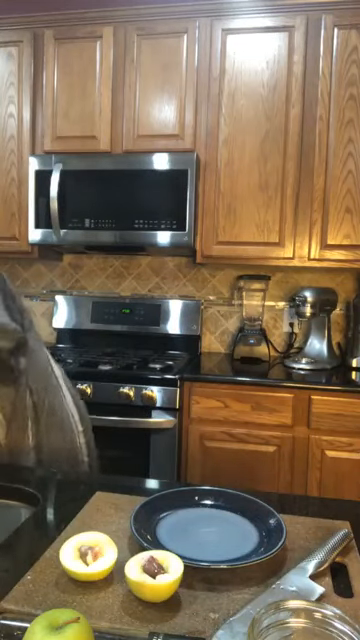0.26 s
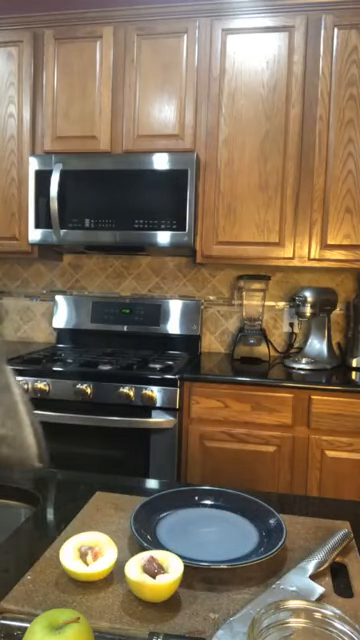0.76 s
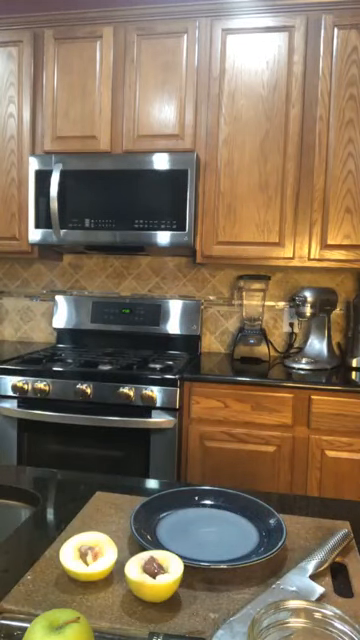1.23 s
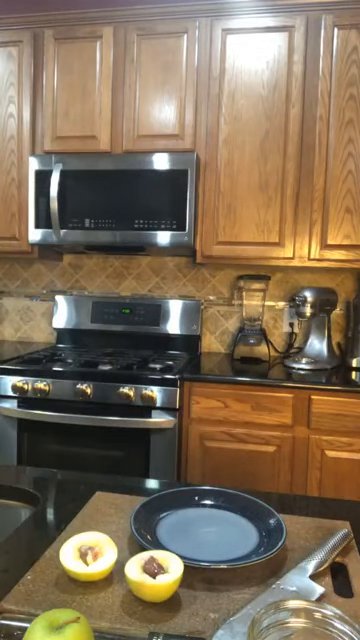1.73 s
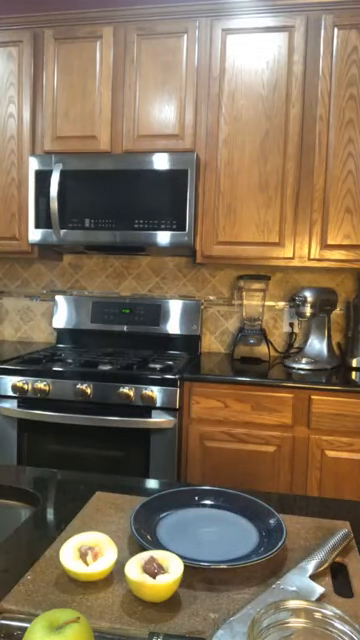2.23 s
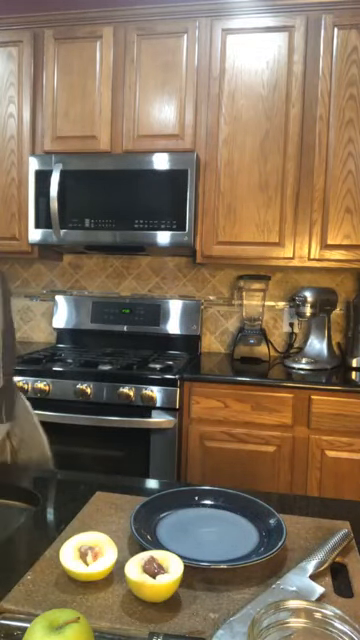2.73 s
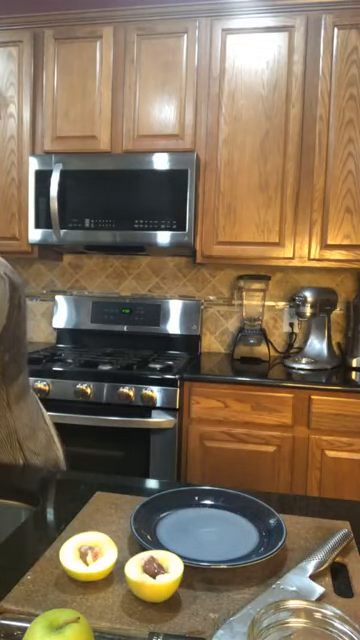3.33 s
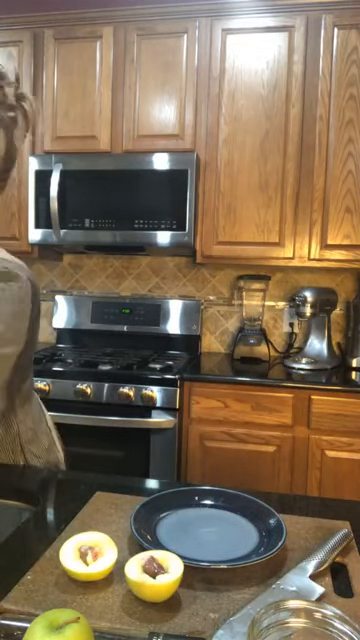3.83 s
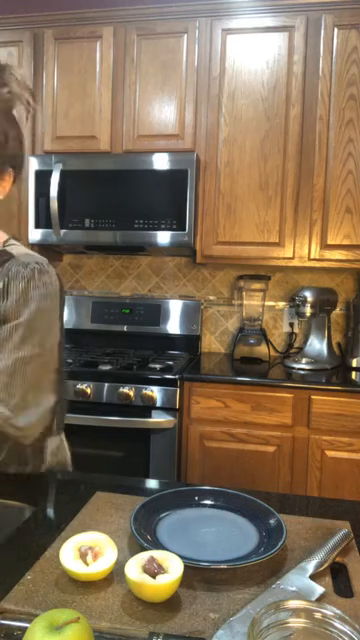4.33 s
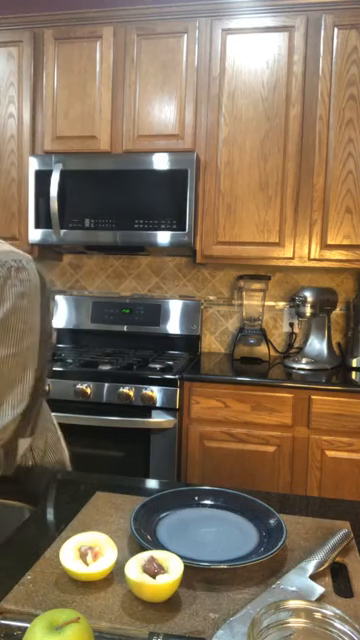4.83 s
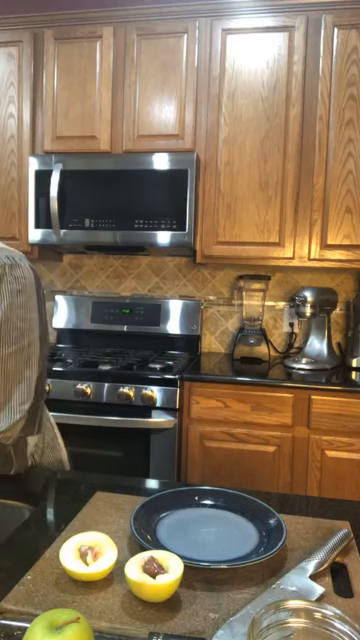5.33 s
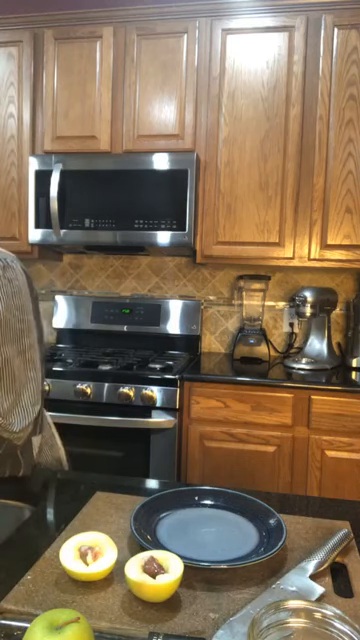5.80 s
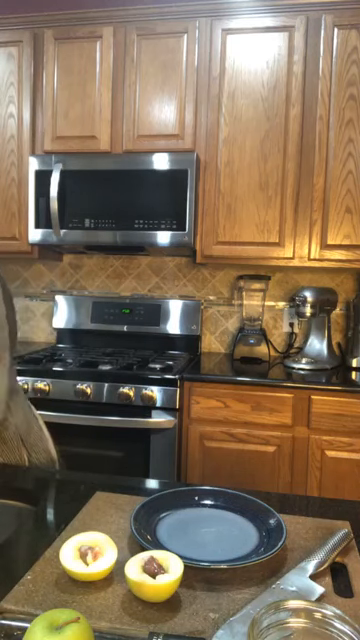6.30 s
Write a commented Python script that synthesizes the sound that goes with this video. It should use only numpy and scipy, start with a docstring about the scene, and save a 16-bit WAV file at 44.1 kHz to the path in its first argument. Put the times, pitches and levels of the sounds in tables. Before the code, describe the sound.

A counter microphone hears faint room air and hum. A coat rustles, a distant wooden door claps twice with a ringing tail, and something hollow knocks. Dull treads, dry floor ticks and gritty scuffs follow, plus light dish touches. After midway, bright aerated water bursts on and stays steady, drumming on the steel sink, with bubbles and irregular splashes, strongest near the end.

```python
"""A kitchen, heard by one microphone on the counter over room air and a low appliance hum.
A cupboard door bangs and rebounds across the room (dense reflections and panel modes), something hollow
is bumped (ringing modes), a coat swishes, and the floor ticks and scuffs as someone walks to the sink.
The tap opens: an aerated jet hisses (dense grains) and drums on the steel basin (ringing modes), and
water spatters and gurgles (grains, bubbles) off what is held under it, with drops, splashes and clinks."""
import sys
import numpy as np
from scipy import signal
from scipy.fft import rfft, irfft, next_fast_len
from scipy.io import wavfile
from scipy.ndimage import uniform_filter1d

SR = 44100
rng = np.random.default_rng(int(sys.argv[2]) if len(sys.argv) > 2 else 0)


def to_wav(sig):
    """Store sig (one row per channel, or 1-D mono) as 16-bit WAV at the path in sys.argv[1].

    Samples outside -1..1 are clipped; the rate is SR.
    """
    pcm = np.clip(np.atleast_2d(sig), -1, 1) * 32767
    pcm = np.round(pcm).astype(np.int16)
    wavfile.write(sys.argv[1], SR, pcm.T)  # frames by channels


N = 289207
TIME = np.arange(N) / SR


def from_db(db):
    """Decibels to gain."""
    return 10 ** (np.asarray(db) / 20)


def rms_one(x):
    """Scale to rms 1."""
    return x / np.sqrt(np.mean(x ** 2) + 1e-20)


def dying(t, t60):
    """Amplitude that falls 60 dB in t60."""
    return np.exp(-np.log(1000) * t / t60)


def at_hz(points, hz):
    """Read (frequency [Hz], value) points on a log-frequency axis."""
    f, value = np.transpose(points)
    return np.interp(np.log(np.maximum(hz, 1)), np.log(f), value)


def coloured(x, spectrum):
    """Give a steady sound a spectrum that falls away steeply past its ends; rms 1."""
    size = next_fast_len(len(x))
    hz = np.arange(size // 2 + 1) * SR / size + 1e-3
    low_end, high_end = spectrum[0][0], spectrum[-1][0]
    ends = np.minimum(1, np.minimum(hz / low_end, high_end / hz)) ** 4   # 24 dB per octave
    shaped = rfft(x, size) * from_db(at_hz(spectrum, hz)) * ends
    return rms_one(irfft(shaped, size)[:len(x)])


def band(x, hz, octaves, order=2):
    """Band-pass around a centre."""
    edges = np.clip([hz / 2 ** (octaves / 2), hz * 2 ** (octaves / 2)], 10, SR / 2 - 1000)
    return signal.sosfilt(signal.butter(order, edges, "band", fs=SR, output="sos"), x)


def drift(rate):
    """Slow chance: straight lines between random values of spread 1, `rate` of them a second."""
    knots = rng.standard_normal(2000)
    return np.interp(TIME * rate, np.arange(len(knots)), knots)


def ring(x, hz, t60):
    """A resonator: a unit click sets a sine of height 1 ringing and dying away."""
    r, w = dying(1 / SR, t60), 2 * np.pi * hz / SR
    return signal.lfilter([0, np.sin(w)], [1, -2 * r * np.cos(w), r * r], x + 1e-18)


def ring_modes(x, modes):
    """Sum the modes (frequency [Hz], level [dB], t60 [s]) of one body, with alternating signs."""
    return sum((-1) ** k * from_db(db) * ring(x, hz, t60) for k, (hz, db, t60) in enumerate(modes))


def add(out, s, sound):
    """Mix a sound in at a time."""
    i = int(s * SR)
    out[i:i + len(sound)] += sound[:N - i]


def grains(per_s, spread_db):
    """Random impacts of uneven size."""
    sizes = from_db(spread_db * np.minimum(rng.exponential(1, N), 5))
    return sizes * rng.choice([-1, 1], N) * (rng.random(N) < per_s / SR)


def strokes(rows, attack_s, hold_s, t60):
    """One envelope from rows (time [s], level [dB]): each stroke rises, holds and dies away."""
    envelope = 0
    for s, db in rows:
        rise = np.clip((TIME - s) / attack_s, 0, 1)
        envelope = envelope + from_db(db) * rise * dying(np.maximum(TIME - s - attack_s - hold_s, 0), t60)
    return envelope


def swing(rows):
    """Gain curve from rows (time [s], level [dB]), relative to their mean level."""
    s, db = np.transpose(rows)
    return from_db(np.interp(TIME, s, db - db.mean()))


def snaps(rows, crest_db):
    """Short impacts: noise bursts that die away, each in one region of pitch."""
    out, t = np.zeros(N), TIME[:SR // 3]
    for s, db, hz, octaves, t60 in rows:
        fall = dying(t, t60)
        burst = band(rng.standard_normal(len(t)) * fall, hz, octaves)
        even = burst * np.linalg.norm(fall) / np.linalg.norm(burst)
        add(out, s, from_db(db - crest_db) * even)   # peaks stand about crest_db above the noise level
    return out


# reverberation time of the room: (frequency [Hz], t60 [s])
ROOM_DECAY = [(80, 1), (300, 0.86), (1000, 0.96), (3000, 0.55), (6000, 0.88), (14000, 0.21)]


def diffuse(noise, tilt_db=0):
    """Let noise die away octave by octave as sound does in the room; tilt_db is per octave."""
    t = TIME[:len(noise)]
    spectrum, hz = rfft(noise), np.arange(len(noise) // 2 + 1) * SR / len(noise)
    octave = np.clip(np.log2((hz + 1) / 1000), -4, 4)   # from 1 kHz
    out = 0
    for k in range(-4, 5):
        part = irfft(spectrum * np.maximum(0, 1 - abs(octave - k)), len(noise))
        out = out + part * from_db(tilt_db * k) * dying(t, at_hz(ROOM_DECAY, 1000 * 2. ** k))
    return out


def kitchen(x, wet_db):
    """Direct sound plus reflections off cabinets and tiles, strongest early on."""
    t = TIME[:SR]
    echo = diffuse(rng.standard_normal(SR)) * (t > .004) * (1 + 1.4 * dying(t, 0.22))
    return x + from_db(wet_db) * signal.fftconvolve(x, echo / np.linalg.norm(echo))[:N]


# colour of the room air: (frequency [Hz], density [dB per Hz])
AIR_COLOUR = [(25, -31), (55, -11), (100, -11), (130, -3), (174, -11), (248, -8), (461, -14.5), (812, -22),
              (1180, -24.5), (2200, -31), (4800, -35.5), (8000, -40), (15800, -48.5)]
AIR_DB = -63   # rms
# appliance hum partials: (frequency [Hz], rms level before wavering [dB])
HUM_PARTIALS = [(119.5, -69), (237, -77.5), (301, -80.5), (458, -79)]


def background(waver_db=2):
    """Steady noise of room air, and hum partials that waver in level and phase."""
    hum = 0
    for hz, db in HUM_PARTIALS:
        level = np.sqrt(2) * from_db(db + waver_db * drift(4.46))
        hum = hum + level * np.sin(2 * np.pi * hz * TIME + .5 * drift(6))
    return hum + from_db(AIR_DB) * coloured(rng.standard_normal(N), AIR_COLOUR)


# swishes of a coat: (time of middle [s], rms level at middle [dB], half-length [s])
COAT_SWISHES = [(0.144, -74.5, 0.028), (0.546, -74.5, 0.046), (0.613, -69.5, 0.011), (0.657, -72, 0.051),
                (2.256, -83, 0.095), (2.564, -71.5, 0.28), (3.074, -74.5, 0.05)]
# colour of rubbing cloth: (frequency [Hz], density [dB per Hz])
CLOTH_COLOUR = [(1500, -1), (3000, 2), (6500, 3), (9000, -1.5), (15000, -5)]


def coat():
    """Cloth slides over cloth in short soft swishes."""
    swishes = sum(from_db(db) * np.exp(-((TIME - s) / length) ** 2) for s, db, length in COAT_SWISHES)
    return swishes * coloured(grains(4000, 1.5), CLOTH_COLOUR)


# soles scuffing: (time [s], rms level [dB])
SOLE_SCUFFS = [(1.55, -63), (1.62, -74), (1.735, -69.5), (1.955, -59.5), (2.075, -63), (2.14, -74),
               (2.44, -67.5), (2.51, -74), (2.675, -61.5), (2.77, -65)]
# colour of the scuffs: (frequency [Hz], density [dB per Hz])
SCUFF_COLOUR = [(700, 4.5), (1400, 1.5), (2600, 3), (4500, -4), (7000, -7.5), (9000, -21), (15000, -35)]
# weight coming down on the floor: (time [s], rms level [dB])
FLOOR_TREADS = [(1.35, -59.5), (1.56, -55), (1.76, -56), (2.06, -54.5)]


def walking():
    """Grainy friction of soles over the dull sound of the floor taking weight."""
    scuffs = strokes(SOLE_SCUFFS, attack_s=0.017, hold_s=0.0083, t60=0.42)
    brush = scuffs * coloured(grains(3000, 2.1), SCUFF_COLOUR)
    treads = strokes(FLOOR_TREADS, attack_s=0.015, hold_s=0.074, t60=0.57)
    return brush + treads * rms_one(band(grains(1500, 1.6), hz=320, octaves=2.06))


# floorboard ticks: (time [s], peak level [dB], pitch settled on [Hz], t60 [s])
BOARD_TICKS = [(1.3861, -38.5, 460, 0.051), (1.525, -43.5, 520, 0.013), (1.615, -40.5, 420, 0.026),
               (1.650, -50, 480, 0.011), (1.7387, -44, 484, 0.02), (1.809, -36.5, 544, 0.023),
               (1.927, -43, 440, 0.018), (2.12, -51, 450, 0.026), (2.166, -55, 378, 0.018)]


def boards(sweep=2.47, sweep_s=0.00078, rise_s=0.001):
    """Bending waves carry the highs first, so each tick falls in pitch."""
    out, t = np.zeros(N), TIME[:SR // 8]
    for s, db, hz, t60 in BOARD_TICKS:
        phase = 2 * np.pi * hz * (t + sweep * sweep_s * (1 - np.exp(-t / sweep_s)))
        tick = np.sin(phase) * (1 - np.exp(-t / rise_s)) ** 2 * dying(t, t60)
        add(out, s, from_db(db) * tick / abs(tick).max())
    return out


# sharp contacts of the door and of things being handled:
# (time [s], approximate peak level [dB], centre [Hz], width [octaves], t60 [s])
HARD_CLICKS = [(0.7895, -29, 3500, 1.6, 0.015), (0.799, -22, 4030, 1, 0.019),
               (0.938, -30.5, 2000, 1.6, 0.024), (0.948, -29.5, 4300, 0.48, 0.027),
               (1.136, -42.5, 5000, 1.3, 0.032), (1.140, -44.5, 3100, 1.44, 0.27),
               (1.350, -45, 1650, 1.54, 0.063), (1.575, -54.5, 6000, 0.81, 0.037),
               (1.980, -56, 5900, 1.1, 0.018), (2.057, -42, 1920, 2.1, 0.083),
               (2.058, -43, 6200, .53, 0.018), (2.317, -41, 2630, .9, 0.015),
               (2.328, -54.5, 9000, 2.7, .12), (2.480, -48, 4800, .28, 0.15),
               (2.483, -42.5, 3200, 2.1, 0.028), (2.546, -47.5, 4000, 0.58, .019),
               (2.756, -46, 6400, 1.2, .063), (2.781, -38.5, 2350, 0.4, 0.018),
               (3.403, -55, 2780, 1.9, 0.015), (3.704, -42, 2900, 2, 0.065)]
CRACK_DB = -6.5   # relative to the peak of its floorboard tick
CRACK_HZ, CRACK_OCTAVES, CRACK_T60_S = 1720, 1.06, 0.029


def contacts():
    """Hard clicks, and the dry crack that starts each floorboard tick, as short noise bursts."""
    cracks = [(s, db + CRACK_DB, CRACK_HZ, CRACK_OCTAVES, CRACK_T60_S) for s, db, hz, t60 in BOARD_TICKS]
    return snaps(HARD_CLICKS + cracks, crest_db=9)


# bumps on a hollow body: (time [s], level [dB], contact softness as low-pass [Hz])
BODY_BUMPS = [(1.1403, -28, 5000), (1.2046, -35.5, 450), (1.352, -45, 4160), (2.058, -45, 3000),
              (2.148, -43.5, 900)]
# modes of the hollow body: (frequency [Hz], level [dB], t60 [s])
BODY_MODES = [(202, -9, 0.13), (339, 2, 0.14), (378, -8.5, 0.13), (480, 0, 0.043), (559, -7.5, 0.097),
              (1270, -24.5, 0.21), (2500, -30.5, 0.37), (3130, -31, 0.41), (3950, -41, 0.8),
              (4340, -39, 0.35)]


def bumps():
    """Soft contacts set the hollow body ringing."""
    blows = np.zeros(N)
    for s, db, soft_hz in BODY_BUMPS:
        push = np.exp(-2 * np.pi * soft_hz * TIME[:SR // 100])
        add(blows, s, from_db(db) * push / push.sum())
    return ring_modes(blows, BODY_MODES)


# cupboard door meeting its frame: (time [s], level [dB], tilt [dB per octave])
DOOR_BANGS = [(0.785, -28.5, 2.6), (0.798, -31, 0), (0.936, -33.5, 2), (0.948, -35.5, -0.5)]
# colour of the bangs: (frequency [Hz], density [dB per Hz])
BANG_COLOUR = [(30, -32), (55, -12), (76, 2), (102, 2), (138, 5), (200, 2), (380, -3.5), (550, -1.5),
               (680, -6.5), (1000, -8), (1450, -12), (2100, -12.5), (4000, -21), (7600, -37.5),
               (15800, -59)]
# modes of the door panel: (frequency [Hz], level [dB], t60 [s])
PANEL_MODES = [(131.9, -11, 0.97), (194, -20, 0.58), (265, -16.5, 0.85), (449, -16, 0.26),
               (552, -4.5, 0.22), (840, -25, 0.5), (1000, -18, 0.48), (1120, -6, 0.54), (1158, -26, 0.49),
               (1353, -12.5, 0.25), (1750, -22, 0.89), (2080, -25, .5), (2306, -23, 0.35),
               (3300, -25, 0.89), (3960, -12, 0.22)]


def door(early=1.0, early_t60=0.086, rise_s=.005, tail_db=-4, panel_db=-2):
    """Far away, each bang arrives as a clattering swell of reflections, with the panel ringing in it."""
    out, blows, t = np.zeros(N), np.zeros(N), TIME[:SR * 3 // 2]
    for s, db, tilt_db in DOOR_BANGS:
        swell = (1 - np.exp(-t / rise_s)) * (from_db(tail_db) + early * dying(t, early_t60))
        crowding = grains(3000 + 30000 * TIME, 1.9)[:len(t)]   # reflections get denser as time passes
        reflections = coloured(crowding, BANG_COLOUR)
        even = reflections / np.sqrt(uniform_filter1d(reflections ** 2, size=6000))
        add(out, s, from_db(db) * swell * diffuse(even, tilt_db))
        add(blows, s + rise_s, from_db([db + panel_db]))
    return out + ring_modes(blows, PANEL_MODES)


# a dish lightly touched: (time [s], level at onset [dB], pitch [Hz], t60 [s])
DISH_CLINKS = [(2.481, -62, 4890, 0.18), (2.781, -57, 2620, 0.11), (3.403, -76, 4020, 0.59)]


def clink():
    """One thin mode rings on after each touch."""
    out, t = np.zeros(N), TIME[:SR // 2]
    for s, db, hz, t60 in DISH_CLINKS:
        add(out, s, from_db(db) * np.sin(2 * np.pi * hz * t) * dying(t, t60))
    return out


# air pockets bursting into bubbles: (time [s], level of each bubble [dB], middle pitch [Hz])
AIR_POCKETS = [(4.965, -53, 1220), (5.095, -45.5, 2160), (5.166, -54, 1080), (5.186, -46, 2500),
               (5.305, -55, 847), (5.426, -46.5, 2400), (5.640, -42, 2170), (5.67, -48, 2350)]


def bubble_bursts(count=6, spread_s=.04, cycles=36, rise=0.2):
    """Each pocket sheds a few bubbles that rise in pitch as they surface."""
    out, t = np.zeros(N), TIME[:SR // 12]
    for s, db, hz in AIR_POCKETS:
        for delay, size in rng.random((count, 2)):
            pitch = hz * 2 ** (0.55 * (size - .5))
            life = cycles / pitch
            tone = np.sin(2 * np.pi * pitch * t * (1 + rise * t / life))
            add(out, s + delay * spread_s, from_db(db) * tone * dying(t, life))
    return out


# big drops slapping the steel: (time [s], approximate peak level [dB], centre [Hz])
BIG_DROPS = [(4.103, -31, 5500), (4.4026, -27.5, 4300), (4.4588, -29.5, 6500), (4.4715, -30.5, 5170),
             (4.5768, -33, 4430), (4.6052, -27, 4840), (4.633, -31, 6050), (4.6761, -32.5, 5740),
             (4.7224, -30.5, 6030), (4.948, -30, 6550), (4.9963, -32.5, 5060), (5.749, -28.5, 5800),
             (5.9528, -22.5, 3300), (5.955, -24.5, 3270), (5.968, -29, 4000), (5.975, -30, 3520),
             (5.990, -29, 4730)]
DROP_OCTAVES, DROP_T60_S = 1.03, 0.018
# longer splashes, bright as spray or dull as a slop on the basin:
# (time [s], approximate peak level [dB], centre [Hz], t60 [s])
LONG_SPLASHES = [(3.712, -43.5, 6500, 0.077), (4.076, -43, 3450, 0.1), (4.102, -39.5, 790, .035),
                 (4.28, -46, 405, .15), (5.30, -44.5, 10000, 0.29), (5.735, -39.5, 5000, 0.19),
                 (6.060, -44, 278, 0.068), (6.073, -34.5, 4800, 0.13), (6.125, -46, 3500, 0.068),
                 (6.458, -45, 4150, .3)]
SPLASH_OCTAVES = 0.47


def splashing():
    """Noise bursts: drops are short and broad in pitch; splashes are narrower and last longer."""
    drops = [(s, db, hz, DROP_OCTAVES, DROP_T60_S) for s, db, hz in BIG_DROPS]
    splashes = [(s, db, hz, SPLASH_OCTAVES, t60) for s, db, hz, t60 in LONG_SPLASHES]
    return snaps(drops + splashes, crest_db=8)


TAP_OPEN_S, TAP_RISE_S = 3.699, .008
AERATE_S = .035   # the jet takes a moment to draw in air
POOL_S = 0.19   # time constant of water covering the basin
SPATTER_BUILD_S, SPATTER_THIN_DB = 0.63, -12   # starts thin and builds as things get wet
SURGES_PER_S, SURGE_DB = 10, 1.54   # rises and falls as they are turned in the stream
# colour of the spatter: (frequency [Hz], density [dB per Hz])
SPATTER_COLOUR = [(1500, -8), (2600, -6), (3400, -3.5), (4400, 1.5), (6000, -2.5), (7500, -2.5),
                  (9000, -18), (15000, -14)]


def spattering(spatter_db=-54, shift_db=3.0):
    """The point of impact wanders, so drops of each size come and go on their own."""
    still_dry = np.clip(1 - (TIME - TAP_OPEN_S) / SPATTER_BUILD_S, 0, 1)
    level_db = spatter_db + SPATTER_THIN_DB * still_dry + SURGE_DB * drift(SURGES_PER_S)
    sizes = 0
    for hz in np.geomspace(1800, 11000, 9):
        sizes = sizes + band(grains(3000, 2.6), hz, .4) * from_db(shift_db * drift(16))
    return from_db(level_db) * coloured(sizes, SPATTER_COLOUR)


# colour of the gurgle: (frequency [Hz], density [dB per Hz])
GURGLE_COLOUR = [(500, 0), (800, -4), (1100, -0.5), (1550, -5), (2000, 3.5), (2600, -4), (3500, 2.5)]


def gurgling(per_s=300, cycles=26, count=26, wash_db=7.0):
    """Small bubbles of many sizes ring in the wash of the water film."""
    born = grains(per_s * from_db(4 * drift(12)), 3.0)
    dealt = rng.integers(0, count, N)   # which size each bubble has
    rings = 0
    for k, hz in enumerate(np.geomspace(750, 3600, count)):
        rings = rings + ring(born * (dealt == k), hz, cycles / hz) * np.sqrt(hz)
    wash = from_db(wash_db) * rng.standard_normal(N)   # level relative to the bubbles
    return coloured(rms_one(rings) + wash, GURGLE_COLOUR)


# colour of the jet: (frequency [Hz], density [dB per Hz])
JET_COLOUR = [(1500, -5.5), (3000, -13), (5000, -3.5), (6800, -1.5), (7700, -1), (8300, -4.5), (9700, -3),
              (10300, -6.5), (13500, -3.5), (15000, -14.5), (16000, -2)]
# modes of the steel basin: (frequency [Hz], level [dB], t60 [s])
BASIN_MODES = [(150.4, -7.5, 0.1), (247, -1, 0.14), (287, -2.5, 0.087), (371, -2, 0.049), (463, -5, 0.065),
               (546.4, -0.5, 0.044)]
# force of the stream on the basin, heard relative to its mean: (time [s], level [dB])
DRUM_FORCE = [(3.9, -65.5), (3.92, -67.5), (5.07, -59), (5.32, -66), (5.37, -68), (5.51, -58.5),
              (5.72, -76), (5.82, -58), (5.94, -65), (6.01, -55), (6.04, -59), (6.06, -52.5), (6.36, -70),
              (6.41, -64.5), (6.56, -61.5)]


def tap(jet_db=-51.0, gurgle_db=-63.0, drum_db=-62, drum_follows=0.95, flutter_db=1.55, gurgle_waver_db=2.5):
    """The jet fizzes with a slight flutter, drops spatter, bubbles ring, and the stream drums on the basin."""
    open_s = np.maximum(TIME - TAP_OPEN_S, 0)
    aerated = np.minimum(open_s / AERATE_S, 1)
    fizz = aerated * from_db(jet_db + flutter_db * drift(40)) * coloured(grains(20000, 3.0), JET_COLOUR)
    pooled = 1 - np.exp(-open_s / POOL_S)   # bubbles need a film of water
    bubbles = pooled * from_db(gurgle_db + gurgle_waver_db * drift(10)) * gurgling()
    steel = rms_one(ring_modes(grains(1500, 3), BASIN_MODES))
    basin = from_db(drum_db) * swing(DRUM_FORCE) ** drum_follows * steel
    return np.minimum(open_s / TAP_RISE_S, 1) * (fizz + spattering() + bubbles + basin)


def scene():
    """Everything reaches one microphone, the same in both channels."""
    ticks = kitchen(boards(), wet_db=-8) + kitchen(contacts(), wet_db=-3)
    thuds = kitchen(bumps(), wet_db=-7.5)
    stream = kitchen(tap(), wet_db=-11)
    splashes = kitchen(splashing() + bubble_bursts(), wet_db=-6.5)
    handling = door() + thuds + ticks + clink()
    return np.tile(handling + walking() + coat() + stream + splashes + background(), (2, 1))


MIC_LOW_HZ, CUTOFF_HZ = 49, 15750


def record(dry):
    """The small microphone loses the deep bass; the top is cut steeply."""
    thin = signal.sosfilt(signal.butter(4, MIC_LOW_HZ, "high", fs=SR, output="sos"), dry)
    return signal.sosfilt(signal.ellip(12, .1, 80, CUTOFF_HZ, fs=SR, output="sos"), thin)


dry = scene()
out = record(dry)
to_wav(out)
```